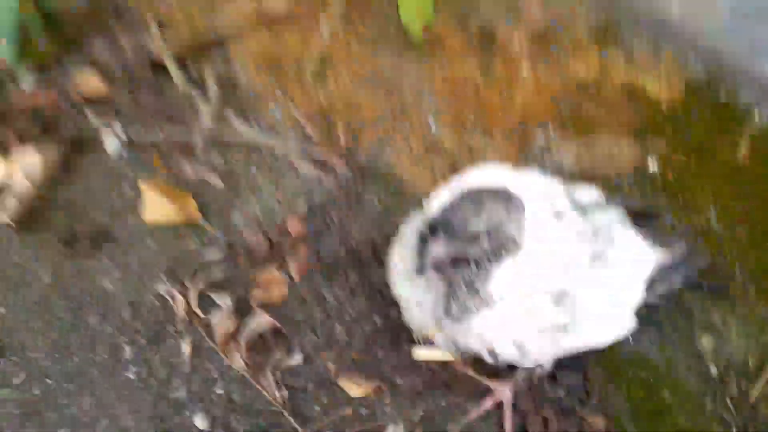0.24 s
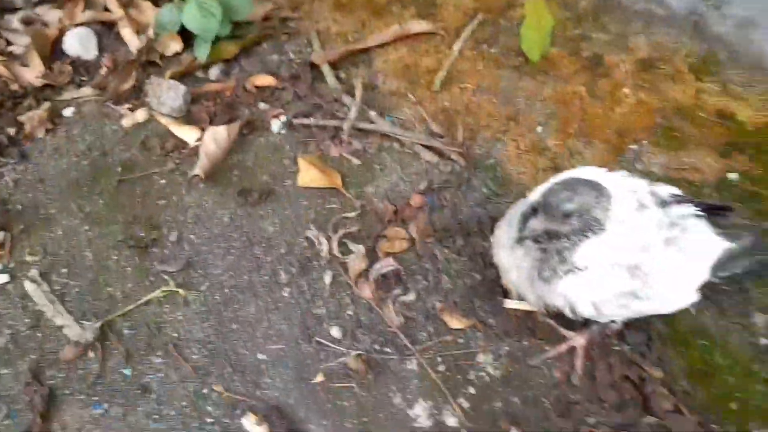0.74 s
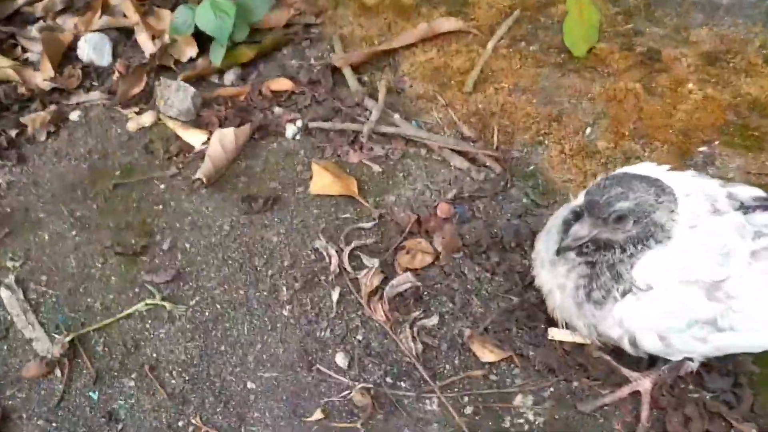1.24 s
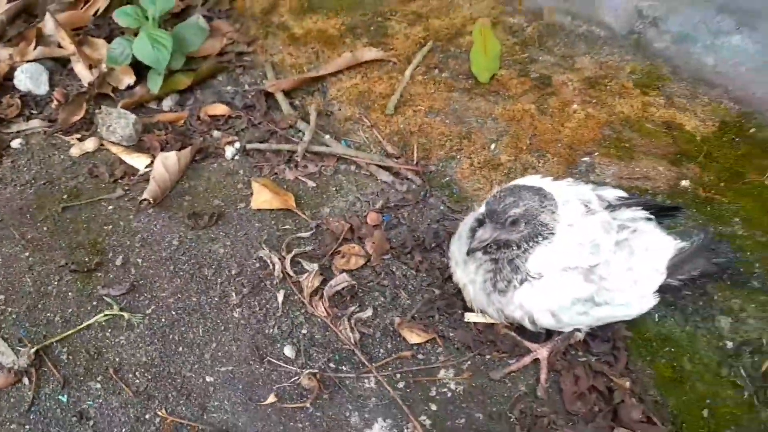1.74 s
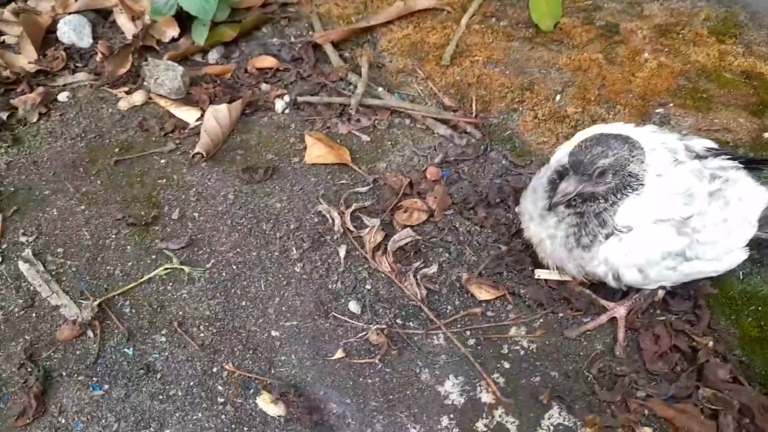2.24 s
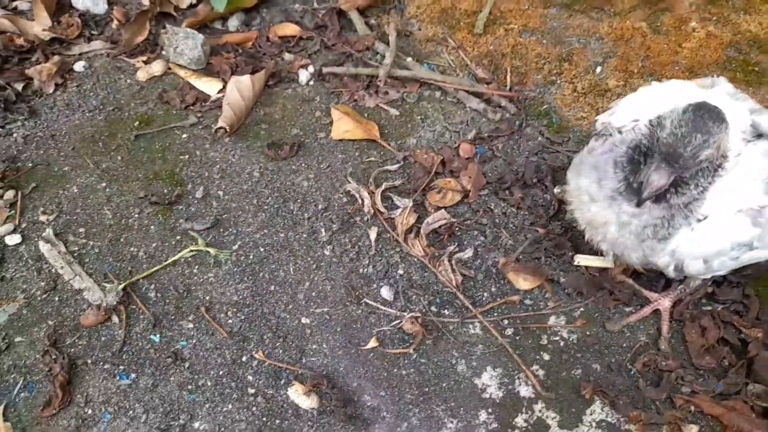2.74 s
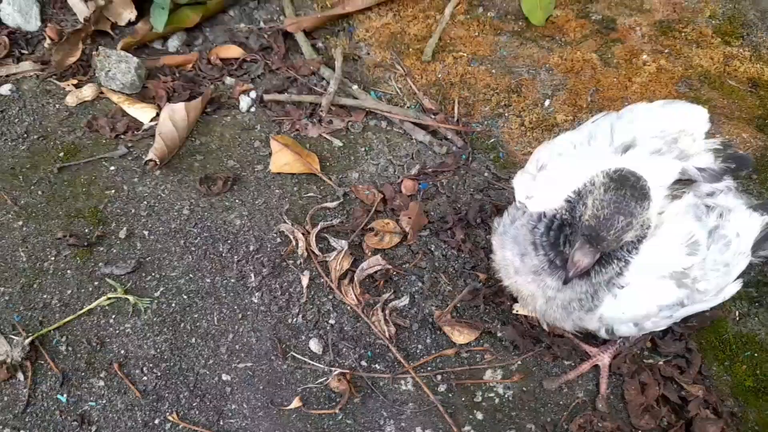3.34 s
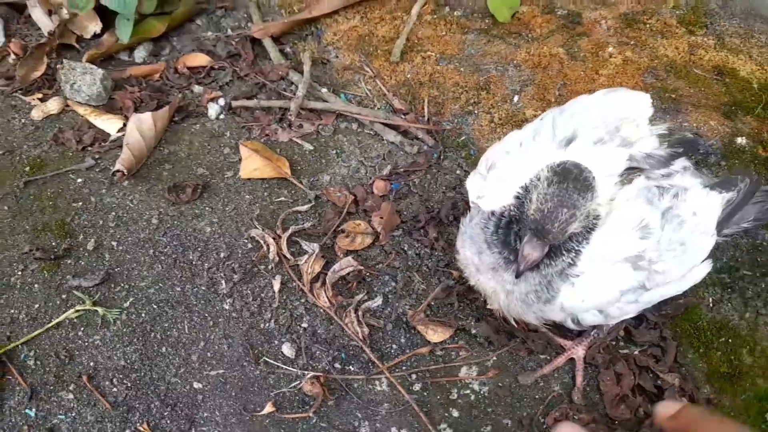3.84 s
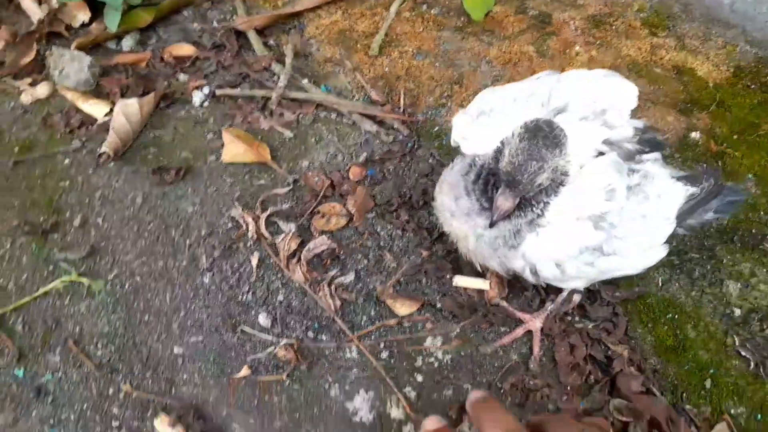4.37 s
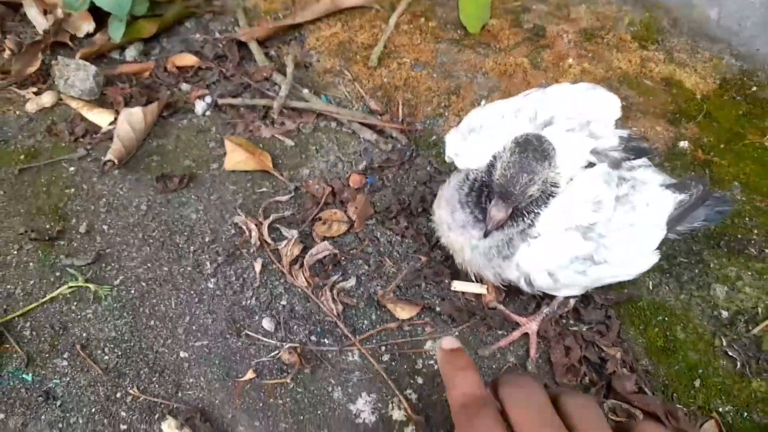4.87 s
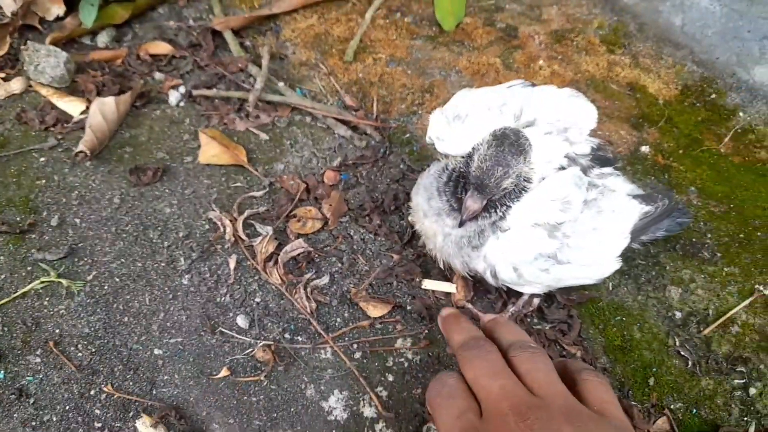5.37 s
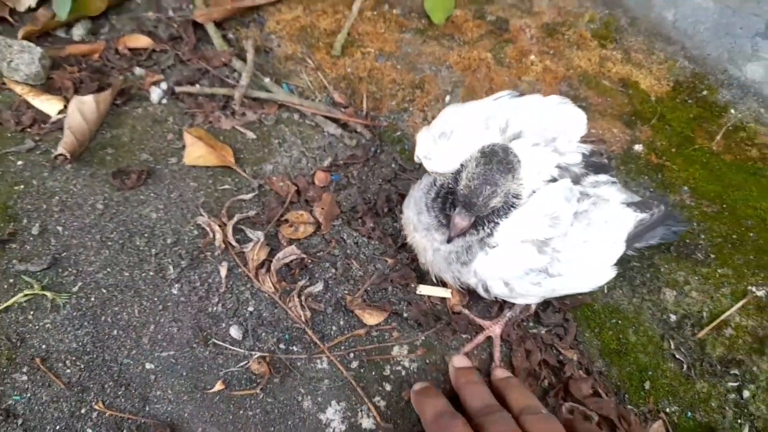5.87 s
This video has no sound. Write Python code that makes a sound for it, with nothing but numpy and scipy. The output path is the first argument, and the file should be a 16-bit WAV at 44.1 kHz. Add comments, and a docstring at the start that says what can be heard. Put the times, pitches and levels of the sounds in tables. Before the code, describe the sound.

A young pigeon close to the microphone gives eight short, thin, high peeps that glide in pitch and sometimes turn raspy. Three come in quick succession, two more follow more slowly, then after a pause come a pair and a last single peep. Soft, brief rustles fall around them. The place is a quiet yard with a faint echo, a steady distant rumble and a low machine hum.

```python
"""A yard with a steady, distant rumble and machine hum still rings briefly from an earlier peep.
A soft rustle swells, the first of several. Then a young pigeon close by gives eight thin, gliding peeps.
The two sides of its voice organ (the syrinx) mostly whistle as one, but at times they drift apart
and beat against each other in a rasp. The yard answers each sound with a faint echo.
The beak clicks open before the fourth and fifth peeps, and a last faint rustle ends the scene."""
import sys
import numpy as np
from scipy import signal
from scipy.fft import rfft, irfft, next_fast_len
from scipy.io import wavfile
from scipy.ndimage import uniform_filter1d, map_coordinates

SR = 44100
rng = np.random.default_rng(int(sys.argv[2]) if len(sys.argv) > 2 else 0)


def to_wav(sig):
    """Store sig (one row per channel, or 1-D mono) as 16-bit WAV at the path in sys.argv[1].

    Samples outside -1..1 are clipped; the rate is SR.
    """
    pcm = np.clip(np.atleast_2d(sig), -1, 1) * 32767
    pcm = np.round(pcm).astype(np.int16)
    wavfile.write(sys.argv[1], SR, pcm.T)  # frames by channels


N = 269451

# tone of the distant outdoor rumble: frequency_hz, gain_db
RUMBLE_TONE = [(15, -14), (45, -5), (110, -1), (190, 1), (270, -2.5), (400, 1), (650, -10.5), (830, -2),
               (1000, -9), (1300, -17.5), (2300, -21), (3300, -30.5), (6000, -46), (16000, -64.5)]
# resonances of the right microphone's opening, which colour the rumble: centre_hz, width_hz, boost_db
RIGHT_RESONANCES = [(360, 77, 1), (653, 33, 11), (1072, 66, 9.5), (1237, 83, 9.5), (1592, 130, 8),
                    (1874, 150, 12.5), (2330, 280, 6), (3080, 250, 4)]
# narrow bands of the machine hum: centre_hz, width_hz, level_db
HUM_BANDS = [(50.87, 6.7, -65.5), (102.5, 8.9, -61.5), (358, 45, -62), (513, 50, -50.5)]
# tone of the microphones' own hiss: frequency_hz, gain_db
MIC_HISS_TONE = [(300, -0.5), (4700, -1), (6500, -2), (8700, -4), (12000, -0.5), (16000, -2)]
# how alike noise is on the left and right (1 is identical): frequency_hz, likeness
STEREO_LIKENESS = [(60, 0.8), (130, 0.99), (290, 0.91), (640, 0.42), (1410, 0.038), (3100, 0.42),
                   (6820, 0.03), (15000, 0.017)]
# soft rustles, each swelling by 20 dB in its rise time: peak_s, level_db, rise_s, body_vs_hiss_db
RUSTLE_STROKES = [(0.107, -53, 0.19, -1), (1.02, -56, 0.096, 4.5), (1.176, -50, 0.01, -35),
                  (1.81, -59.5, 0.13, 0), (2.092, -47.5, 0.03, 7), (3.03, -61.5, .02, -15.5),
                  (3.135, -46, 0.018, -36), (4.066, -43.5, 0.02, -9), (4.861, -51, 0.035, -23.5),
                  (4.913, -44, 0.018, -3.5), (5.024, -60, .007, -14.5), (5.888, -65, 0.096, -26.5)]
# tone of a rustle's bright hiss: frequency_hz, gain_db
RUSTLE_HISS_TONE = [(1000, -21.5), (2500, -2.5), (4000, 1), (5500, -3.5), (7000, -4.5), (10000, -10.5),
                    (13000, -7.5), (16000, -28.5)]
# tone of a rustle's low body: frequency_hz, gain_db
RUSTLE_BODY_TONE = [(150, -13.5), (320, 4), (600, -5.5), (1300, 4.5), (2200, -4.5), (3500, -12.5),
                    (8000, -38)]
# how long the yard's echo takes to fade by 60 dB: frequency_hz, fade_s
YARD_FADE = [(1000, .36), (4500, .32), (9000, .3), (15000, .26)]
# the held part of each peep, as one list of points per peep: time_s, pitch_hz, level_db
PEEP_GLIDES = [
    [(0.284, 3865, -37), (0.294, 3804, -34), (0.315, 4037, -32.5), (0.368, 4006, -33.5),
     (0.389, 4553, -25.5), (0.404, 4424, -25), (0.434, 4290, -37), (0.485, 4520, -19), (0.498, 4460, -19)],
    [(0.752, 3670, -33.5), (0.764, 4017, -30.5), (0.794, 3563, -22.5), (0.812, 3995, -29.0),
     (0.857, 4393, -18.5), (0.88, 4828, -13), (0.902, 4630, -16.5), (0.93, 4473, -9), (0.96, 4432, -16.5)],
    [(1.222, 4040, -24), (1.232, 4544, -14.5), (1.255, 4880, -24.5), (1.268, 4776, -15.5),
     (1.291, 4350, -15.5), (1.346, 4438, -14.5), (1.373, 4742, -10.5), (1.385, 4238, -17.5),
     (1.422, 4246, -16.5)],
    [(1.975, 3904, -35), (1.986, 3830, -33), (2.035, 4180, -19.5), (2.066, 4100, -20), (2.086, 4620, -13.5),
     (2.098, 4650, -12), (2.114, 4052, -21), (2.124, 4060, -22.5)],
    [(2.582, 3880, -32.5), (2.604, 3815, -24.5), (2.619, 3723, -22), (2.671, 3828, -22),
     (2.699, 4300, -21.5), (2.715, 3920, -22.0), (2.768, 4310, -23.5), (2.796, 4250, -24)],
    [(3.857, 3827, -30), (3.867, 3944, -26), (3.892, 4633, -19), (3.918, 4120, -20), (3.965, 4653, -12.0),
     (3.992, 4522, -10.5), (4.026, 5170, -15), (4.036, 4773, -21.5), (4.06, 4967, -12.5)],
    [(4.256, 4080, -25.5), (4.264, 4350, -23.5), (4.28, 4056, -21), (4.313, 4197, -18.5),
     (4.351, 4310, -17), (4.378, 4770, -14.5), (4.394, 4494, -15), (4.437, 4617, -14), (4.449, 4480, -17.5)],
    [(5.197, 3660, -34.5), (5.214, 3748, -19), (5.275, 3807, -16), (5.289, 3852, -17.5), (5.33, 4435, -27),
     (5.358, 4325, -26.5), (5.377, 4706, -17), (5.413, 4805, -23.5), (5.424, 4586, -17)],
]
# each peep has its own colour, with base levels for harmonics 2 and 3 and the hiss: second_db,
# third_vs_second_db, right_overtones_db, hiss_vs_second_db, left_lead_ms
PEEP_COLOURS = [(-40.5, -8.5, -15.5, -10, .454), (-35.5, -2.5, -19.5, -17, 0.477),
                (-42.5, -7, -17, -23.5, .4995), (-36.5, -11.5, -17, -15, .471), (-46, 0, -14, -23.5, .488),
                (-41, -2.5, -20.5, -20.5, .448), (-40.5, -13, -15.5, -25, .448),
                (-37.5, -12.5, -15.5, -24, 0.501)]
# rasps, when the second side of the syrinx runs free: start_s, end_s, widest_offset_hz, vs_first_side_db
RASPS = [(0.282, .355, 417.5, -10.5), (0.421, 0.456, 549.5, -13), (.85, 0.908, -290, -4),
         (.952, 0.988, -420, -5), (1.243, 1.27, -950, 1), (1.276, 1.402, -300, -8),
         (2.6, 2.632, 448.5, -15.5), (4.008, 4.064, -380, -4), (4.244, 4.308, 278.5, -11.5),
         (5.305, 5.383, -1020, -1), (5.381, 5.411, -260, -10.5), (5.414, 5.456, -520, -1)]
# sound bouncing off the ground favours one side as the pitch moves: pitch_hz, left_vs_right_db
GROUND_PAN = [(3400, 2), (3800, 1), (4050, 2), (4230, 9.5), (4400, 3.5), (4600, -0.5), (4750, 3.5),
              (5050, 2.5)]
# the open beak's high resonance: frequency_hz, gain_db
BEAK_RESONANCE = [(9500, -19), (11300, -5), (12500, -4), (13500, 1), (14500, -1), (15500, -3)]
# tone of the bird's breath and beak clicks: frequency_hz, gain_db
BREATH_TONE = [(2000, -17), (3300, -4), (4500, 12), (5600, -6), (7000, -0.5), (9000, -10), (11000, -15),
               (13500, -4), (16000, -10.5)]
# the beak parts just before a peep: start_s, level_db
BEAK_CLICKS = [(1.955, -43), (2.547, -46.5)]

REST_HZ, SCOOP_S, FALL_S = 3226, 0.012, .029  # a peep scoops up from this resting pitch and falls back
SCOOP_DB, FALL_DB, FALL_BEND = 9, 14, 1.3  # level lost at each end; a bend above 1 starts the fall gently
LOCK_HZ, SLIP_S = 201, .007  # any closer and the two sides lock; time they take to slip or lock
FALL_SPLIT_HZ, FALL_SPLIT_DB = -420, -14  # the sides also part as the pressure drops at a peep's end
JITTER, TREMOR = .002, .004  # fast and slow wavering, as fractions of the pitch
RAGGED_DB, RAGGED_PITCH = 2, .012  # in a rasp the free side's strength and the pitch both waver
USUAL_DB, RASP_DB = -19.5, 7  # the whistle's usual level; overtone boost per share of the free side
OVERTONE_GROWTH = .4  # overtone dB gained per dB of whistle above its usual level
HIGH_GROWTH, HISS_GROWTH = 0.27, .35  # extra dB per dB for the higher overtones and the hiss
TOP_HZ = 15600


def amp(db):
    """Turn decibels into a gain."""
    return 10 ** (np.asarray(db) / 20)


def unit(x):
    """Scale a signal to an average (rms) level of 1."""
    return x / np.sqrt(np.mean(x ** 2) + 1e-20)


def along(points, hz):
    """Read between a table's (frequency, value) points on a logarithmic frequency scale."""
    frequencies, values = np.transpose(points)
    return np.interp(np.log(hz + 1), np.log(frequencies), values)


def wobble(rate):
    """A smooth random curve through `rate` random values a second."""
    return map_coordinates(rng.standard_normal(int(N * rate / SR) + 4), [np.arange(N) * rate / SR])


def filtered(x, response):
    """Scale each frequency in x by the gain response(hz)."""
    size = next_fast_len(N + SR // 2)
    return irfft(rfft(x, size) * response(np.fft.rfftfreq(size, 1 / SR)), size)[..., :N]


def noise(gain):
    """Stereo noise of level 1, shaped by gain(hz): both sides alike in the bass, unrelated up high."""
    def mid_and_side(hz):
        angle = np.arccos(np.clip(along(STEREO_LIKENESS, hz), -1, 1)) / 2
        return gain(hz) * np.array([np.cos(angle), np.sin(angle)])
    mid, side = filtered(rng.standard_normal((2, N)), mid_and_side)
    return unit(np.array([mid + side, mid - side]))


def toned_noise(tone):
    """Noise that follows a tone table."""
    return noise(lambda hz: amp(along(tone, hz)))


def band_noise(centre_hz, width_hz):
    """A narrow band of noise, heard as a fuzzy note."""
    return noise(lambda hz: 1 / (1 + ((hz - centre_hz) / width_hz) ** 2))


def background(rumble_db=-51.0, drift_db=0.83, hiss_db=-68.0):
    """Distant outdoor rumble, the fuzzy notes of a machine hum, and the microphones' own hiss."""
    def right_boost_db(hz):
        return sum(db * np.exp(-((hz - centre) / width) ** 2) for centre, width, db in RIGHT_RESONANCES)
    rumble = filtered(toned_noise(RUMBLE_TONE), lambda hz: amp([0 * hz, right_boost_db(hz)]))
    hum = sum(amp(db) * band_noise(centre, width) for centre, width, db in HUM_BANDS)
    hiss = amp(hiss_db + np.array([[.7], [-.7]])) * toned_noise(MIC_HISS_TONE)
    return amp(rumble_db + drift_db * wobble(8.9)) * rumble + hum + hiss


def lingering_ring(level_db=-45, fade_s=0.23):
    """At the start the yard still rings with an earlier peep."""
    return amp(level_db - 60 * np.arange(N) / SR / fade_s) * band_noise(centre_hz=4420, width_hz=170)


def rustles(grain_db=1.5, shortest_fade_s=.2, linger=3.2):
    """Short brushing sounds: a grainy hiss with a little body, swelling and dying away."""
    t = np.arange(N) / SR
    hiss, body = np.zeros(N), np.zeros(N)
    for peak_s, db, rise_s, body_db in RUSTLE_STROKES:
        fade_s = shortest_fade_s + linger * rise_s  # a slow stroke dies slowly
        before, after = np.maximum(peak_s - t, 0), np.maximum(t - peak_s, 0)
        stroke = amp(db - 20 * before / rise_s - 60 * after / fade_s)
        hiss += stroke
        body += stroke * amp(body_db)
    grain = unit(amp(grain_db * wobble(400)))
    return grain * (hiss * toned_noise(RUSTLE_HISS_TONE) + body * toned_noise(RUSTLE_BODY_TONE))


def yard_echo(sound, early_db=-26, tail_db=-28, early_fade_s=.26):
    """Nearby ground and walls scatter a quick answer, and a faint tail lasts a little longer."""
    hz, t, spectrum = signal.stft(rng.standard_normal((2, SR * 3 // 4)), SR, nperseg=256)
    tail = signal.istft(spectrum * amp(-60 * t / along(YARD_FADE, hz)[:, None]), SR, nperseg=256)[1]
    early = rng.standard_normal(tail.shape) * amp(-60 * np.arange(tail.shape[1]) / SR / early_fade_s)
    answer = amp(tail_db) * tail / np.linalg.norm(tail[0])
    answer += amp(early_db) * early / np.linalg.norm(early[0])
    delayed = np.pad(sound[0], (200, 0))
    return signal.fftconvolve(delayed[None], answer, axes=1)[:, :N]


def peep_shape(glide, t):
    """One peep scoops up, holds and falls: gives when it is on, its pitch, level and on-off fade."""
    times, hz, db = np.transpose(glide)
    on = (t > times[0] - SCOOP_S) & (t < times[-1] + FALL_S)
    t = t[on]
    scoop = np.clip((times[0] - t) / SCOOP_S, 0, 1)
    fall = np.clip((t - times[-1]) / FALL_S, 0, 1) ** FALL_BEND
    pitch = REST_HZ + (np.interp(t, times, hz) - REST_HZ) * (1 - scoop ** 2) * (1 - fall)
    level = np.interp(t, times, db) - SCOOP_DB * scoop - FALL_DB * fall
    gate = np.clip(np.minimum(t - t[0], t[-1] - t) / .003, 0, 1)
    return on, uniform_filter1d(pitch, size=300), uniform_filter1d(level, size=200), gate


def free_side(t, waver=.2):
    """In a rasp one side of the syrinx drifts off and locks again: gives its pitch offset and strength."""
    offset, strength = np.zeros(N), np.zeros(N)
    falls = [(glide[-1][0], glide[-1][0] + FALL_S, FALL_SPLIT_HZ, FALL_SPLIT_DB) for glide in PEEP_GLIDES]
    for start, end, widest_hz, db in falls + RASPS:
        on = (t >= start) & (t < end)
        arch = np.sin(np.pi * (t[on] - start) / (end - start))
        offset[on] = np.sign(widest_hz) * LOCK_HZ * (1 - arch) + widest_hz * arch
        strength[on] = amp(db)
    slip = int(SLIP_S * SR)
    offset = uniform_filter1d(offset, size=slip) * (1 + waver * wobble(120))
    strength = uniform_filter1d(strength, size=slip) * amp(RAGGED_DB * wobble(110))
    return offset, strength


def pigeon(flutter_db=1.0, overtone_flutter_db=2.5, airy_db=-43, smear_db=-20, fourth_db=-10,
           rasp_hiss=5, swing_hz=400, hiss_swell_db=3.0):
    """Two membranes whistle; their joint motion distorts into weak overtones, with a hiss of breath."""
    t = np.arange(N) / SR
    offset, strength = free_side(t)
    share = strength ** 2 / (1 + strength ** 2)  # the free side's part of the power
    unsteady = 1 + TREMOR * wobble(110) + JITTER * wobble(900) + RAGGED_PITCH * share * wobble(400)
    # swirling air in the throat puts a fuzz of noise around the whistle, and more around its overtones
    fuzz = amp(airy_db) * (1 + 16 * share) * (wobble(1400) + 1j * wobble(1400))
    smear = np.array([wobble(1300) + 1j * wobble(1500) for ear in range(2)])
    smear *= amp(smear_db) * (1 + 5 * share)
    hiss = (1 + rasp_hiss * share) * amp(hiss_swell_db * wobble(50)) * toned_noise(BREATH_TONE)
    flutter = amp(flutter_db * wobble(160))
    flicker = amp(overtone_flutter_db * np.array([wobble(55) for harmonic in range(3)]))
    out = np.zeros((2, N))
    for glide, (second_db, third_db, shade_db, hiss_db, lead_ms) in zip(PEEP_GLIDES, PEEP_COLOURS):
        on, pitch, db, gate = peep_shape(glide, t)
        # the two sides lie above and below the pitch, the louder one nearer to it
        first_side = np.exp(2j * np.pi * np.cumsum(pitch * unsteady[on] - offset[on] * share[on]) / SR)
        beat = np.exp(2j * np.pi * np.cumsum(offset[on]) / SR)
        # they share one airflow, which mirrors the free side weakly across the first
        free = np.sqrt(share[on]) * (beat + 0.19 * (1 - 2 * share[on]) / beat)
        voice = first_side * (np.sqrt(1 - share[on]) + free + fuzz[on])
        # the right microphone hears it later
        stereo = voice * np.exp(-2j * np.pi * np.outer([0, 1], pitch) * lead_ms / 1000)
        pan_db = along(GROUND_PAN, pitch)
        whistle = amp(db + np.array([pan_db, -pan_db]) / 2) * stereo
        # the overtones follow the whistle's level part of the way, and flare in a rasp
        effort_db = db - USUAL_DB
        overtone_db = second_db + OVERTONE_GROWTH * effort_db + RASP_DB * share[on]
        # the membranes can only move so far, so the overtones throb less than the whistle does
        motion = stereo / np.sqrt((1 + np.abs(stereo) ** 2) / 2)
        # the high overtones flare as the glide carries them into the beak's resonance
        bright = amp(third_db + HIGH_GROWTH * effort_db + along(BEAK_RESONANCE, 3 * pitch))
        high = flicker[1, on] * motion ** 3 + amp(fourth_db) * flicker[2, on] * motion ** 4
        overtones = flicker[0, on] * motion ** 2 + bright * high
        # each beat swings the overtones in pitch, spreading them into a rasp
        swing = swing_hz / np.maximum(np.abs(offset[on]), LOCK_HZ)
        overtones *= np.exp(1j * swing * np.sqrt(share[on]) * beat.real) + smear[:, on]
        overtones *= amp(overtone_db + np.array([[0], [shade_db]]))  # the mic housing shades the right
        breath = amp(hiss_db + overtone_db + HISS_GROWTH * effort_db) * hiss[:, on]
        out[:, on] += gate * flutter[on] * (whistle + overtones + breath).real
    return out


def beak_clicks(fade_s=.012):
    """Tiny dry clicks as the beak parts."""
    t = np.arange(N) / SR
    level = sum((t >= start) * amp(db - 60 * np.abs(t - start) / fade_s) for start, db in BEAK_CLICKS)
    return level * toned_noise(BREATH_TONE)


def scene():
    """The bird and the rustles echo in the yard, over the background."""
    near = pigeon() + beak_clicks() + rustles()
    return near + yard_echo(near) + lingering_ring() + background()


def record(dry):
    """Cut away the very highest treble, above TOP_HZ."""
    return filtered(dry, lambda hz: hz < TOP_HZ)


dry = scene()
out = record(dry)
to_wav(out)
```